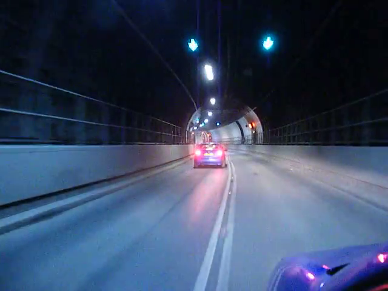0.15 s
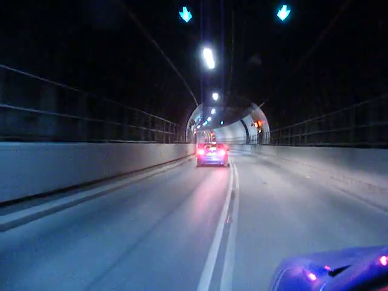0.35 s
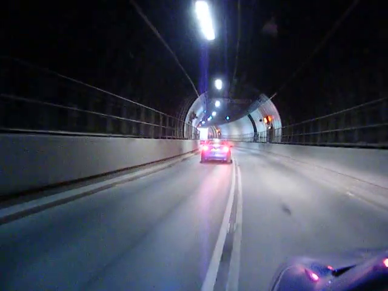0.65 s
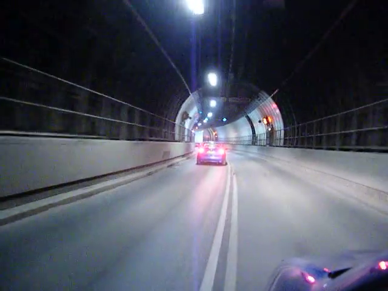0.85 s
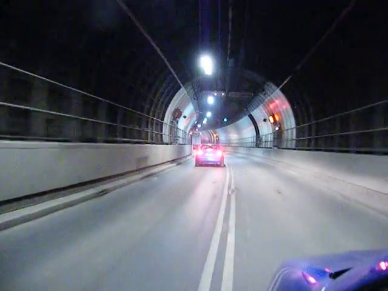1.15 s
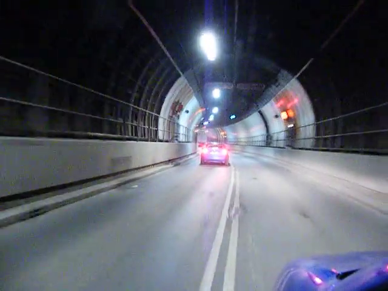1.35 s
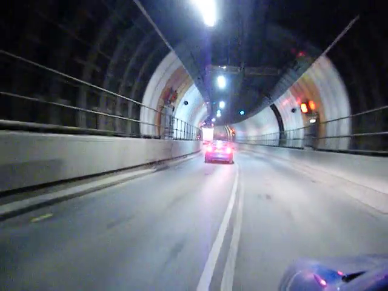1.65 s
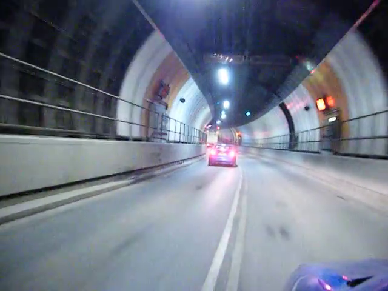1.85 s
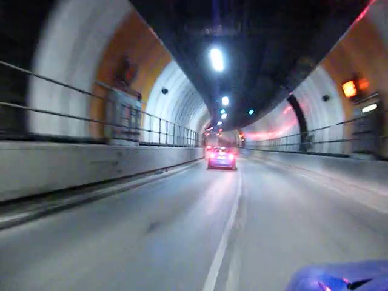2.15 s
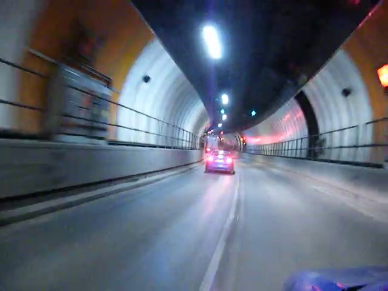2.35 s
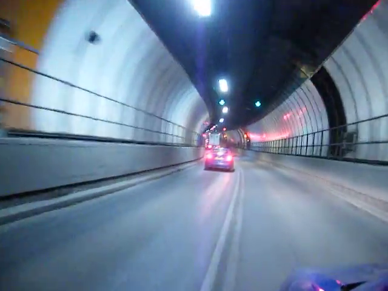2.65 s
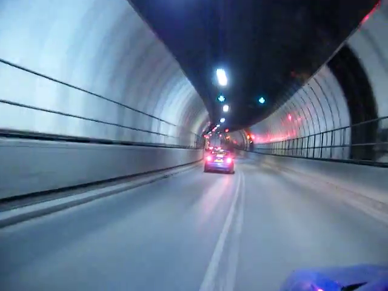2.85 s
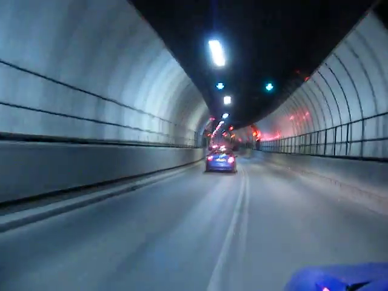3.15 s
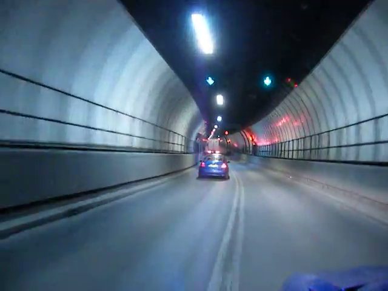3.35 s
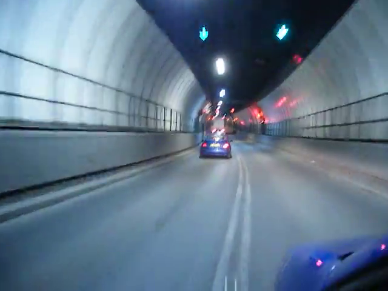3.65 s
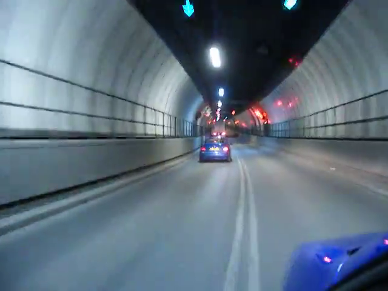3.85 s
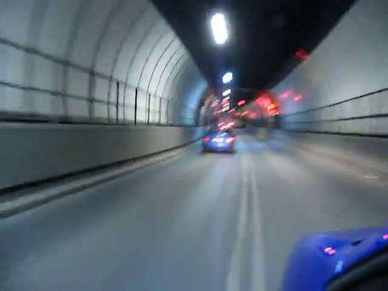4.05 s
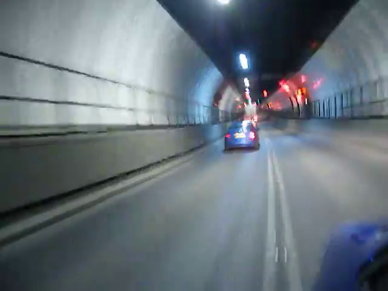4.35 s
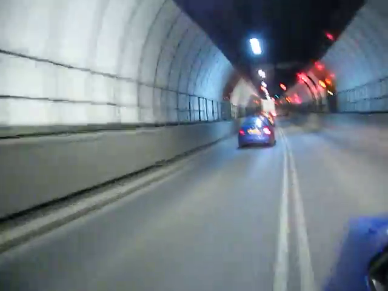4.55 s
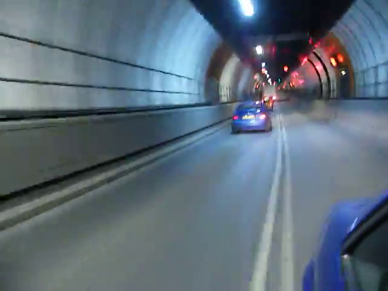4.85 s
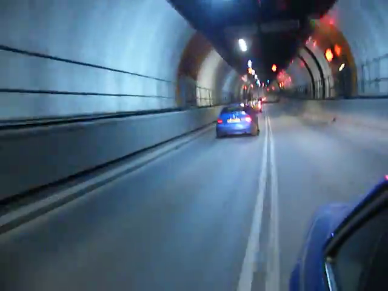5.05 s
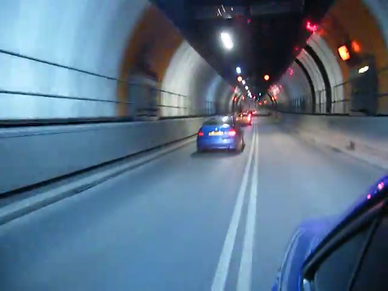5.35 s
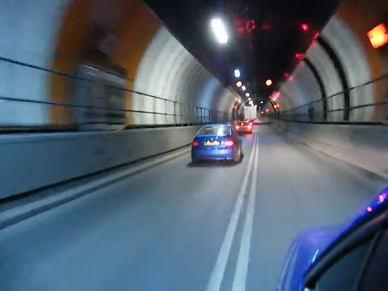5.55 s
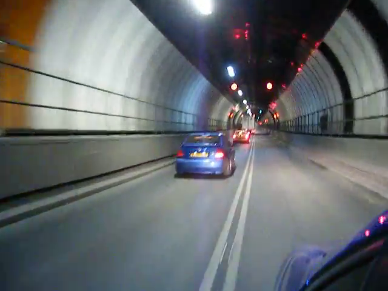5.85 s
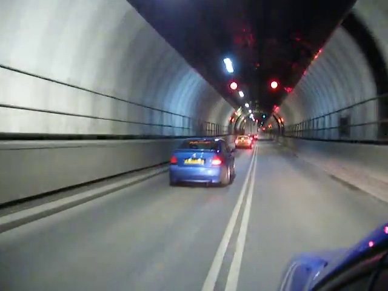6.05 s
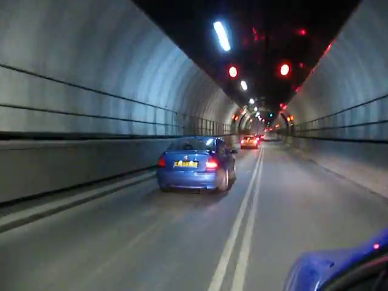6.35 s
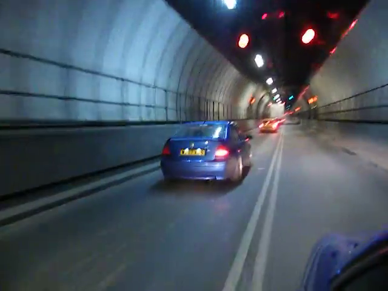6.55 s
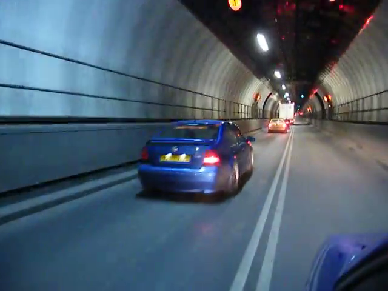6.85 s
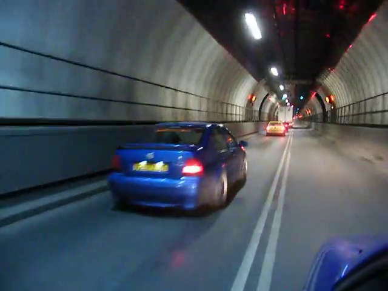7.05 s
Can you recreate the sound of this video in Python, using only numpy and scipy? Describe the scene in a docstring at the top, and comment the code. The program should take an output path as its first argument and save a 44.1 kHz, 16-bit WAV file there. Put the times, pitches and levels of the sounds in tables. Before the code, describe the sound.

From a fast car in a road tunnel, a bare microphone in the airflow catches low wind thumps and sharp pops over steady tyre roar. Hiss off the walls swells and jumps around two and three seconds, while a fuzzy two-note engine drone wavers. The drone sinks away before five seconds; a heavy thump follows, the hiss drops, and crackling pops crowd the end. The sound is dull, close and overloaded.

```python
"""A camera held out of a fast car in a road tunnel, its bare microphone in the wind.
At first wind thumps and pops lie over tyre roar, hiss off the walls and a fuzzy two-note engine drone.
The hiss jumps up near 2.1 s and 3.2 s; the drone sinks away by 4.75 s; near 5.3 s a strong thump comes,
then the hiss drops. From 5.5 s sharp pops crowd in, and some hiss returns near 6.1 s. Wind and pops are
skewed noise and short dips, tyres coloured noise, the engine sines; the recorder overloads."""
import sys
import numpy as np
from scipy import signal
from scipy.io import wavfile
from scipy.ndimage import uniform_filter1d

SR = 44100
rng = np.random.default_rng(int(sys.argv[2]) if len(sys.argv) > 2 else 0)


def file_out(sig):
    """Save sig as 16-bit WAV at sys.argv[1]."""
    # one column per channel
    cols = np.atleast_2d(sig).T
    # limit, then scale
    lim = np.clip(cols, -1, 1)
    pcm = np.round(lim * 32767).astype(np.int16)
    wavfile.write(sys.argv[1], SR, pcm)


N = 318244  # length [samples]

# Wind thumps before their quick wander: (time [s], level [dB])
WIND_LEVEL = [(0, -12.5), (.28, -18.5), (.85, -13), (1.4, -16), (1.9, -14), (2.3, -16), (3.15, -15),
              (3.4, -20), (4.0, -19.5), (4.3, -16), (4.7, -16), (4.9, -13), (5.35, -10), (5.5, -15),
              (5.68, -14), (5.85, -17.5), (7.22, -15.5)]
# Colour of the noise that is skewed into thumps: (frequency [Hz], relative density [dB])
THUMP_COLOUR = [(8, -6), (25, -1), (70, 1), (140, 0.5), (260, -9.5), (600, -32.5)]
# Strongest suction pops of eddies on the microphone; the dip comes 40 samples after the time:
# (time [s], level [dB], width [ms])
STRONG_POPS = [(0.843, -7, 0.12), (0.988, -12, 0.092), (1.8387, -10.5, 0.13), (1.899, -7.5, .15),
               (1.938, -9.5, 0.17), (2.0234, -8.5, .12), (2.0827, -12, 0.19), (2.6415, -12.5, 0.24),
               (3.072, -8, 0.11), (3.0941, -1, 0.14), (3.1781, -3, 0.19), (3.2026, -9.5, 0.25),
               (3.222, -20, 0.17), (4.2365, -8.5, 0.15), (4.2853, -11, 0.15), (4.359, -7, 0.084),
               (4.9568, -11.5, 0.099), (4.9734, -6.5, 0.18), (5.5308, -6.5, 0.23), (5.5765, -10, 0.12),
               (5.7036, -6, 2.9), (5.754, -7.5, .25), (5.7751, -8.5, 0.2), (5.8588, -3, 0.26),
               (5.917, -4, 1.5), (5.9533, -7.5, 0.18), (5.967, -2, 1.3), (6.0128, 2.5, 0.16),
               (6.087, -8.5, 0.13), (6.106, -3.5, 0.17), (6.1235, -8, 0.14), (6.347, -12, .13),
               (6.4748, -4, 0.12), (6.484, -7, .13), (6.5211, -11.5, 0.25), (6.538, -5, 0.17),
               (6.597, -2.5, 0.15), (6.64, -8, 0.11), (7.087, -6.5, 0.17), (7.1058, -4, 0.15),
               (7.141, -6.5, 0.15), (7.1857, -7.5, 0.13)]
# Random eddies by size, before clumping and random extra strength: (width [ms], rate [1/s], level [dB])
EDDY_SIZES = [(.16, 300, -28), (.4, 260, -19), (.8, 160, -15), (1.6, 50, -15)]
# Tyre hiss thrown back by the walls, before a fixed lift and the flutter; it jumps where a new
# stretch of wall begins: (time [s], level [dB])
WALL_HISS = [(0, -31), (.17, -29.5), (.72, -37), (.95, -31.5), (1.15, -40.5), (1.65, -33), (2.07, -36.5),
             (2.085, -27.5), (2.45, -33), (2.72, -29.5), (2.9, -32), (3.24, -35.5), (3.25, -28.5),
             (3.85, -31), (4.08, -34), (4.65, -29), (4.9, -34.5), (5.35, -36), (5.45, -44.5), (6.03, -43),
             (6.11, -36), (7.22, -38.5)]
# Tunnel roar when the wall hiss stands at -34 dB, before flutter: (time [s], level [dB])
ROAR_LEVEL = [(0, -14), (1.0, -15), (1.5, -14.5), (2.2, -14.5), (3.1, -15), (4.6, -14.5), (5.0, -18),
              (5.9, -17), (7.22, -18)]
# Colour of the tyre roar: (frequency [Hz], relative density [dB])
ROAR_COLOUR = [(70, -34), (150, -7), (280, 1), (450, -2), (800, -10), (1400, -23.5), (2500, -32),
               (5000, -62.5)]
# Colour of the tyre hiss: (frequency [Hz], relative density [dB])
HISS_COLOUR = [(400, -23), (900, 3), (1500, -4.5), (2500, -11), (3800, -19.5), (5200, -23), (6500, -30)]
# Colour of the bright rush near walls: (frequency [Hz], relative density [dB])
RUSH_COLOUR = [(1500, -3), (2500, 4.5), (4000, -0.5), (5800, -7)]
# Peak levels of the engine hums before blurring: (time [s], lower hum [dB], upper hum [dB])
HUM_LEVELS = [(0, -17.5, -23.5), (.35, -23, -25.5), (.7, -15, -23.5), (1.15, -18.5, -28.5), (1.5, -17, -26),
              (1.95, -15.5, -24.5), (2.2, -31.5, -13.5), (2.5, -28, -24.5), (2.75, -21, -17),
              (3.0, -17, -34.5), (3.25, -19.5, -22), (3.4, -21.5, -16.5), (3.9, -14, -15.5),
              (4.25, -30, -25.5), (4.5, -19, -19.5), (4.75, -30.5, -33.5), (5.3, -35, -36),
              (7.22, -36, -41.5)]
# Pitch of the lower hum before wander; it sags and snaps back: (time [s], pitch [Hz])
LOW_HUM_PITCH = [(0, 195), (.55, 206), (1.15, 178), (1.27, 209), (1.6, 199), (1.95, 212), (2.6, 200),
                 (3.02, 212), (3.22, 194), (3.45, 208), (7.22, 202)]

SUCTION_SKEW = 0.24  # how much deeper the dips are than the pushes
EDDY_SPREAD_DB = 3.0  # scale of the random extra strength
ROAR_FOLLOWS = 0.25  # dB of roar per dB of hiss
ROAR_LURCH_DB, ROAR_LURCH_S = 1.5, 0.028  # lurches in the gusts
HIGH_HUM_HZ = 412  # before wander
HUM_WANDER, HUM_WANDER_S = 0.015, 0.15  # share of the pitch, smoothing time
STEP = 4  # keep one sample in this many
FULL = 1 / np.sqrt(2)  # overload limit


def gain_of(db):
    """Turns decibels into a gain."""
    return 10 ** (np.asarray(db) / 20)


def evened(x):
    """Scales a signal to an average strength (rms) of 1."""
    return x / np.sqrt(np.mean(x ** 2) + 1e-20)


def column(table, index):
    """Reads one table column for every sample, with straight lines between rows."""
    rows = np.array(table)
    return np.interp(np.arange(N) / SR, rows[:, 0], rows[:, index])


def drift(seconds):
    """Random wander of rms 1: noise smoothed twice over the given time."""
    size = max(int(seconds * SR), 1)
    once = uniform_filter1d(rng.standard_normal(N), size)
    return evened(uniform_filter1d(once, size))


def noise(colour, patchy_db, size):
    """Random short-time spectra of a given colour, broken into louder and softer patches."""
    hz = np.fft.rfftfreq(size, 1 / SR)
    re, im, patches = rng.standard_normal((4 * N // size + 5, len(hz), 3)).T
    patches = uniform_filter1d(patches, size=10, axis=0)  # smooth across frequency
    patches = evened(uniform_filter1d(patches, size=8, axis=1))  # smooth across time
    f, db = np.transpose(colour)
    colour_db = np.interp(np.log(hz + 1), np.log(f), db, left=-90, right=-90)
    spectra = (re + 1j * im) * gain_of(colour_db[:, None] + patchy_db * patches)
    sound = signal.istft(spectra, nperseg=size, noverlap=size - size // 4)[1]
    return evened(sound[:N])


def hiss_db():
    """Level of the tyre hiss that the walls throw back."""
    return column(WALL_HISS, index=1)


def gusty():
    """How far the wind stands out: most where the walls give back little."""
    return np.clip((-26 - hiss_db()) / 9, 0.2, 1.5)


def wind():
    """Large eddies push the diaphragm in lumps; suction dips are deeper and sharper than the pushes."""
    push = noise(THUMP_COLOUR, patchy_db=0.4, size=4096)
    lumps = -np.exp(-SUCTION_SKEW * push)
    level_db = column(WIND_LEVEL, index=1) + 1.0 * drift(0.073)
    return gain_of(level_db) * evened(lumps - lumps.mean())


def pop(width_s):
    """A short pressure dip on top of a faint, wider bump of the opposite sign."""
    u = np.arange(-600, 601) / SR / width_s
    dip = -1 / np.sqrt(1 + u ** 2) ** 5.3
    return dip + 0.12 * np.exp(-abs(u) / 17.0)


def pops():
    """Eddies of several sizes collapse in random clumps; the strongest come at listed times."""
    out = np.zeros(N)
    clumps = gusty() * gain_of(4.0 * drift(0.0072))
    for width_ms, per_s, db in EDDY_SIZES:
        extra_db = EDDY_SPREAD_DB * np.minimum(rng.exponential(1, N), 2.5)
        starts = rng.random(N) < clumps * per_s / SR
        hits = gain_of(db + extra_db) * starts
        out += signal.oaconvolve(hits, pop(width_ms / 1000), "same")
    for s, db, width_ms in STRONG_POPS:
        at = round(s * SR) - 560
        out[at:at + 1201] += gain_of(db) * pop(max(width_ms, 0.05) / 1000)[:N - at]
    return out


def road():
    """Tyre roar and hiss off the walls; gusts past the microphone make both flutter."""
    level_db = hiss_db()
    flutter = gusty() * (drift(0.004) + 0.55 * drift(0.012))

    roar_db = column(ROAR_LEVEL, index=1) + ROAR_FOLLOWS * (level_db + 34)
    roar_db = roar_db + ROAR_LURCH_DB * gusty() * drift(ROAR_LURCH_S)
    roar = gain_of(roar_db + 1.2 * flutter) * noise(ROAR_COLOUR, patchy_db=0.45, size=2048)

    hiss = gain_of(level_db + 5.0 + 2.95 * flutter) * noise(HISS_COLOUR, patchy_db=0.5, size=512)

    # near walls add a bright rush that grows far faster than the hiss
    rush_db = 5.1 * (level_db + 29) - 37.0
    rush = gain_of(rush_db) * noise(RUSH_COLOUR, patchy_db=3.0, size=512)
    return roar + hiss + rush


def engine():
    """Two hums about an octave apart, blurred by uneven firing and the tunnel's echoes."""
    out = np.zeros(N)
    pitches = (column(LOW_HUM_PITCH, index=1), HIGH_HUM_HZ)
    for index, hz in enumerate(pitches, start=1):
        wander = HUM_WANDER * drift(HUM_WANDER_S) + 0.022 * drift(0.03)
        turns = np.cumsum(hz * (1 + wander)) / SR
        level_db = column(HUM_LEVELS, index) + 3.07 * drift(0.035)
        out += gain_of(level_db) * np.sin(2 * np.pi * turns)
    return out


def scene():
    """Adds all sounds at one microphone."""
    return (wind() + pops() + road() + engine())[None]


def low_pass(x):
    """Removes everything above the highest recorded frequency."""
    return signal.sosfilt(signal.butter(12, 15800, fs=SR, output="sos"), x)


def record(dry):
    """Lopsided capsule, overload at a quarter sample rate, interpolation whose overshoot clips again."""
    bent = dry - 0.26 * (dry ** 2 - np.mean(dry ** 2))
    bent = signal.lfilter(*signal.butter(1, 6, "high", fs=SR), bent)  # coupling capacitor

    smooth = signal.firwin(63, 5800, window=("kaiser", 8), fs=SR)[None]
    slow = signal.oaconvolve(bent, smooth, "same")[:, ::STEP]
    slow = np.clip(slow, -FULL, FULL)

    # back to the full rate: space the samples out and fill the gaps
    spread = np.zeros_like(dry)
    spread[:, ::STEP] = STEP * slow
    fill = signal.firwin(111, 5520, window=("kaiser", 8), fs=SR)[None]
    rebuilt = signal.oaconvolve(spread, fill, "same")
    return low_pass(np.clip(rebuilt, -FULL, FULL))


dry = scene()
out = record(dry)
file_out(out)
```